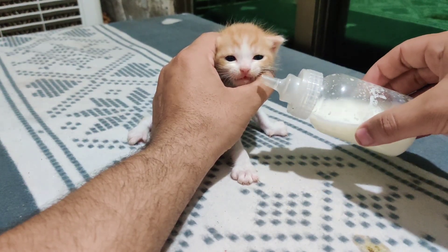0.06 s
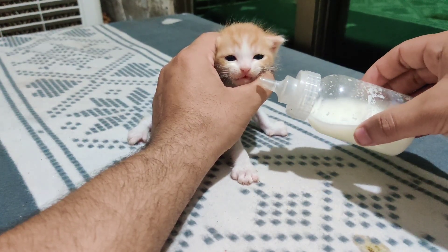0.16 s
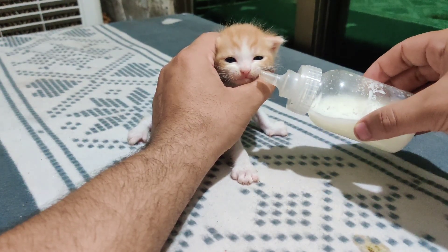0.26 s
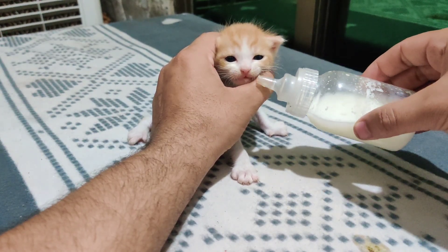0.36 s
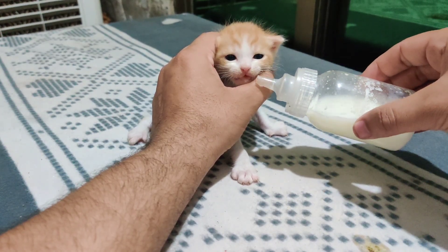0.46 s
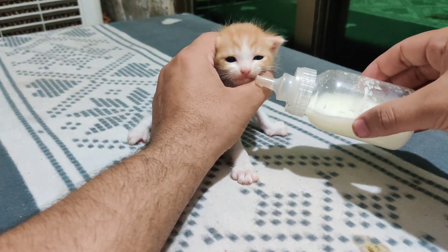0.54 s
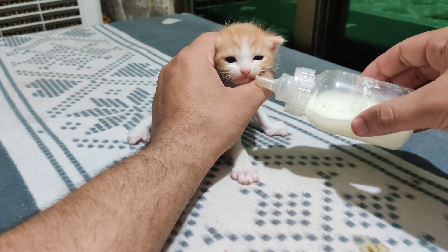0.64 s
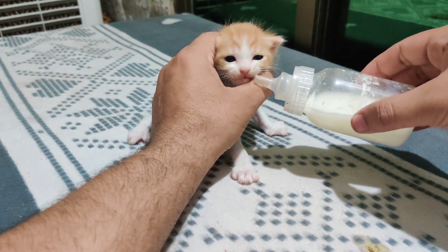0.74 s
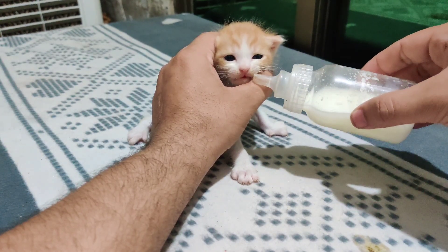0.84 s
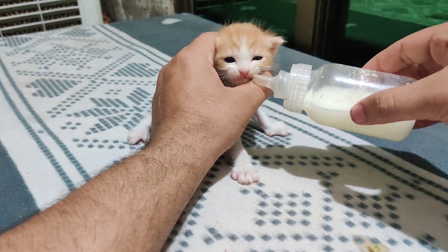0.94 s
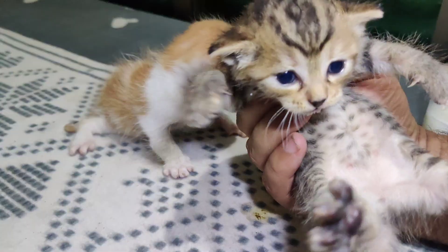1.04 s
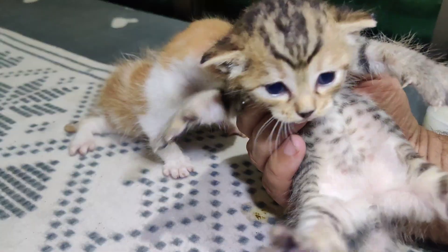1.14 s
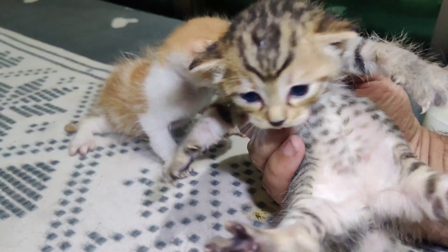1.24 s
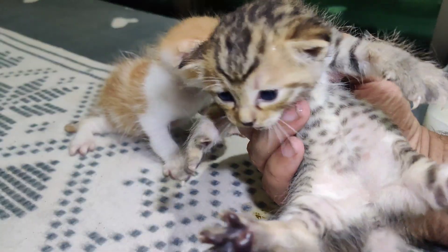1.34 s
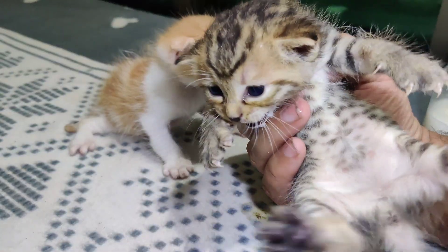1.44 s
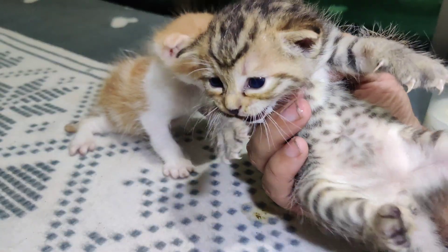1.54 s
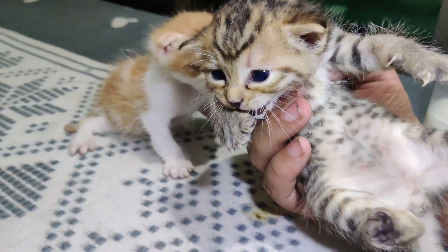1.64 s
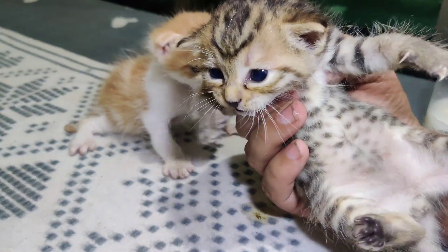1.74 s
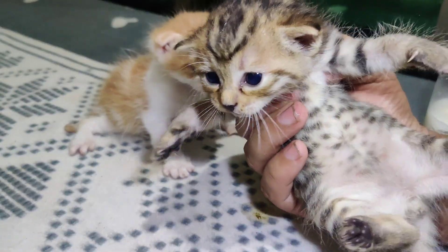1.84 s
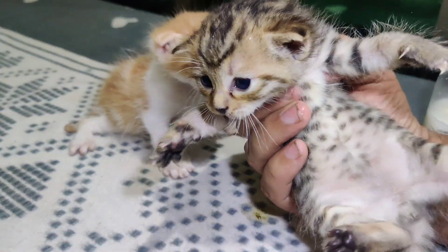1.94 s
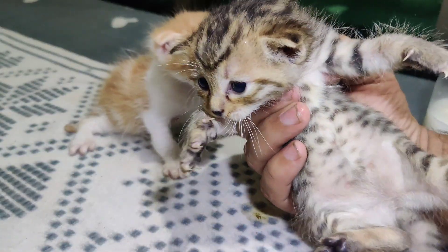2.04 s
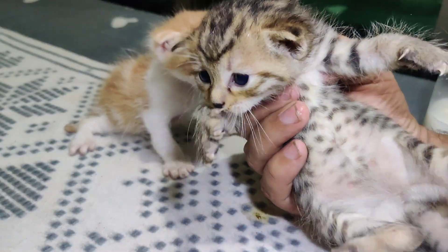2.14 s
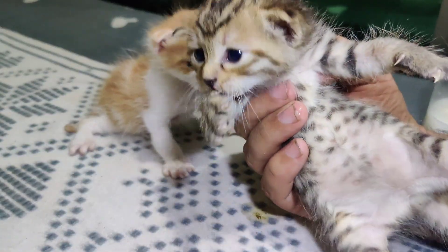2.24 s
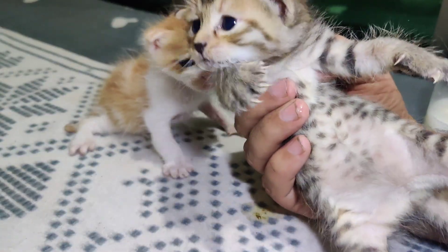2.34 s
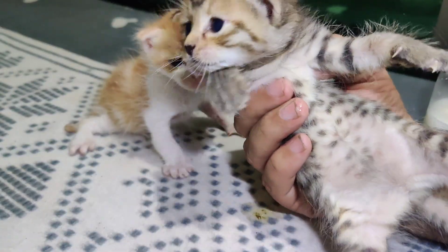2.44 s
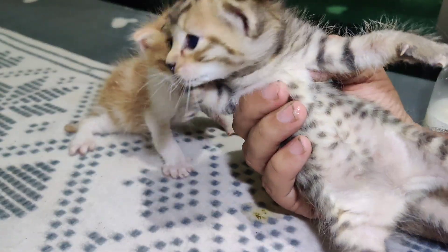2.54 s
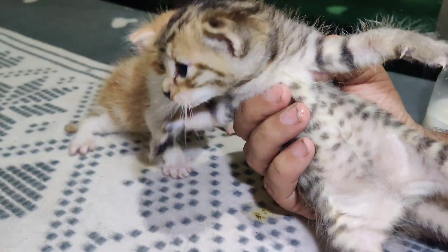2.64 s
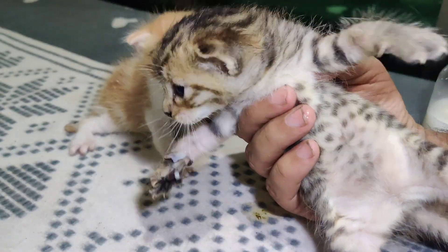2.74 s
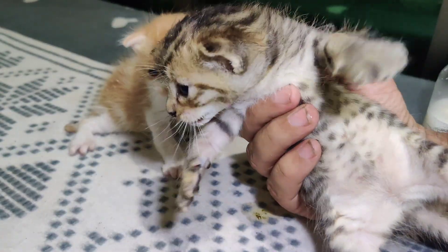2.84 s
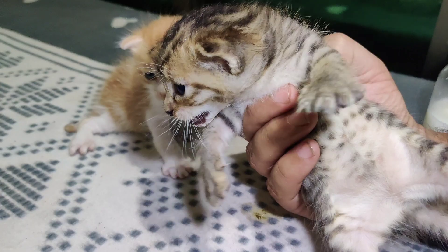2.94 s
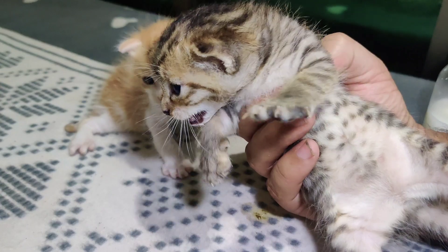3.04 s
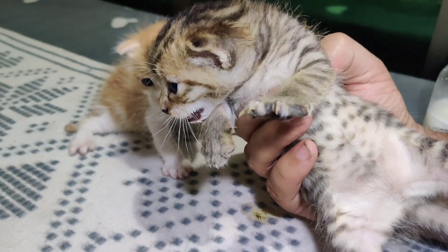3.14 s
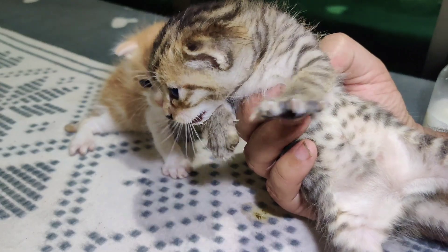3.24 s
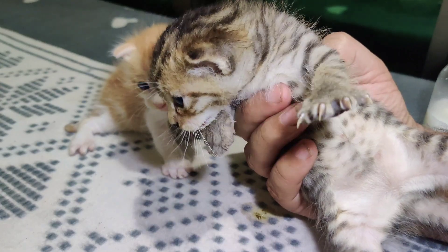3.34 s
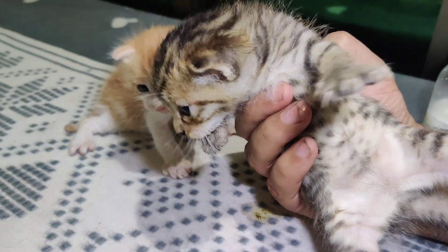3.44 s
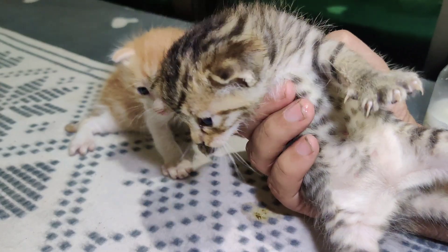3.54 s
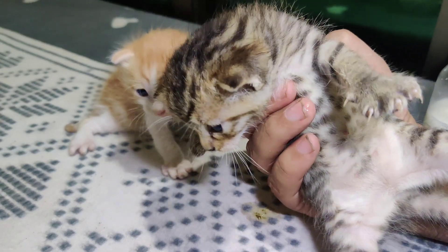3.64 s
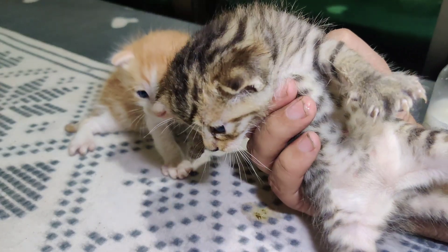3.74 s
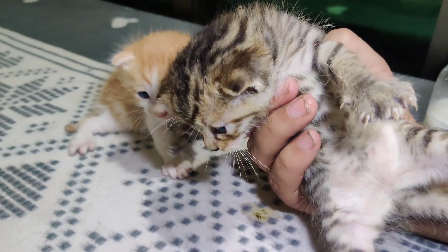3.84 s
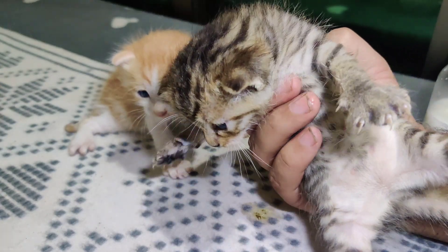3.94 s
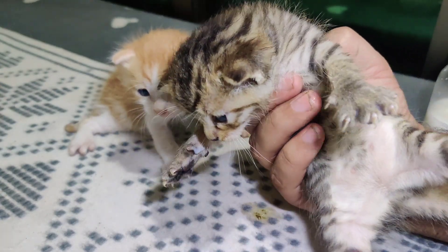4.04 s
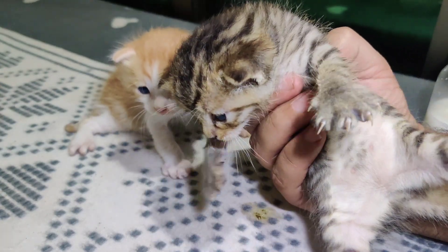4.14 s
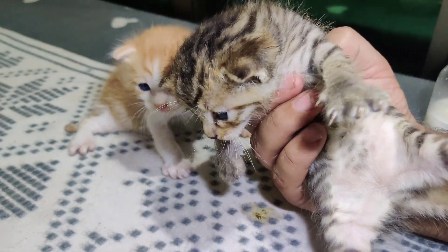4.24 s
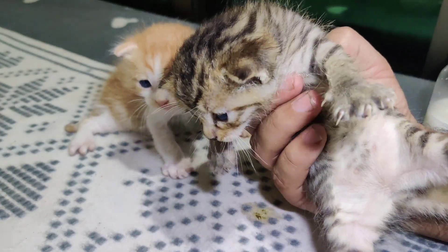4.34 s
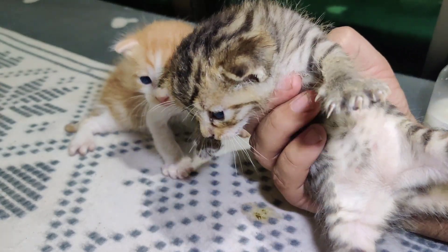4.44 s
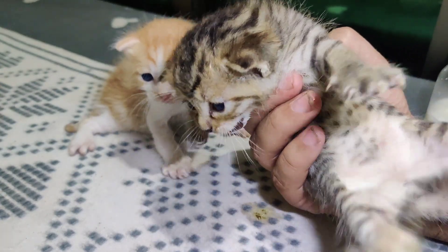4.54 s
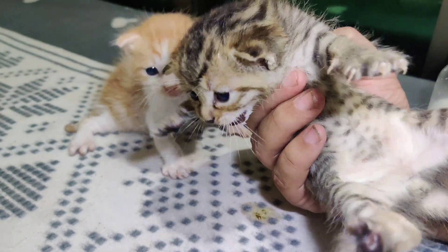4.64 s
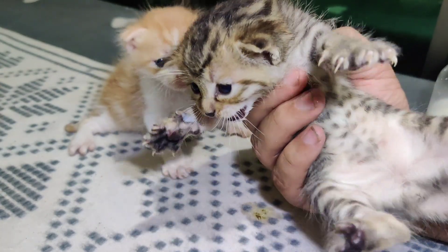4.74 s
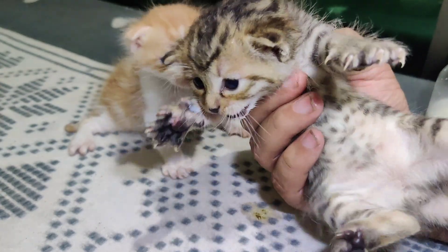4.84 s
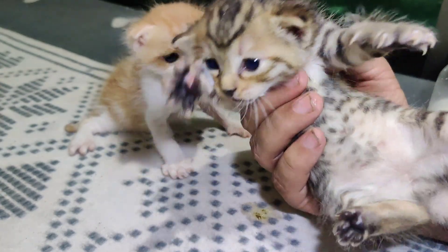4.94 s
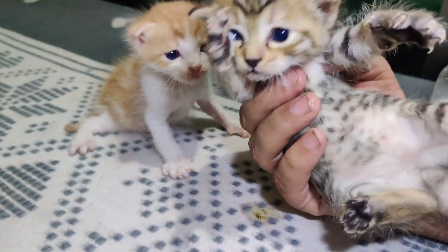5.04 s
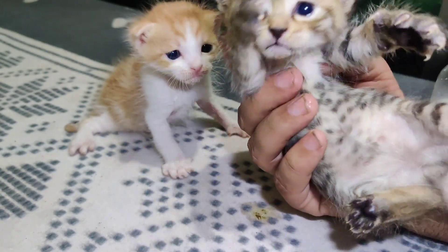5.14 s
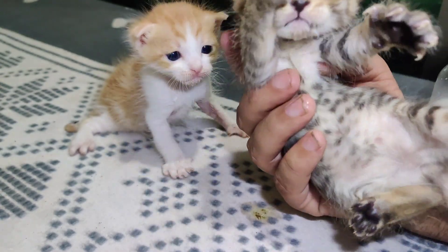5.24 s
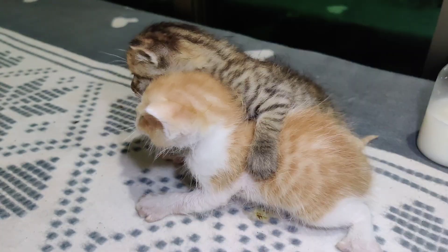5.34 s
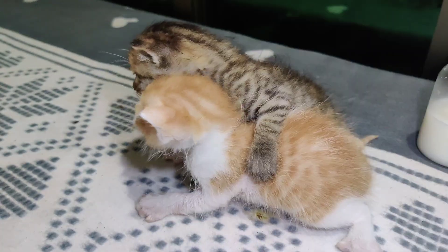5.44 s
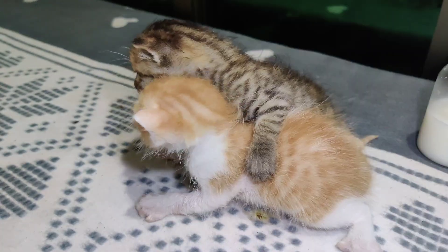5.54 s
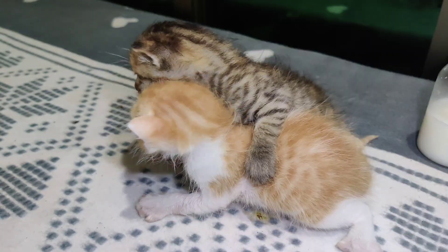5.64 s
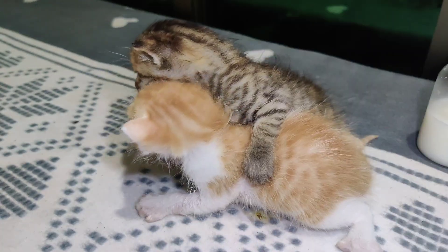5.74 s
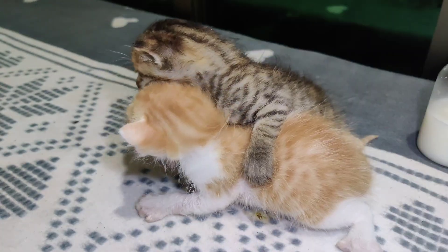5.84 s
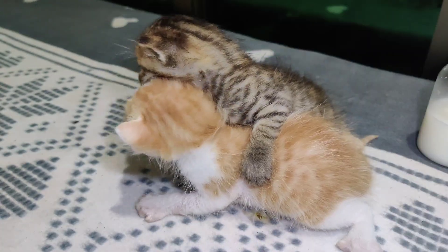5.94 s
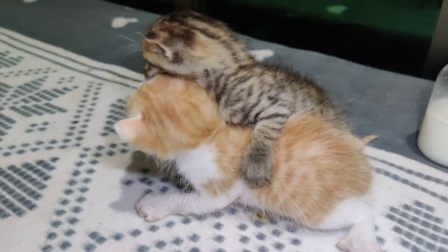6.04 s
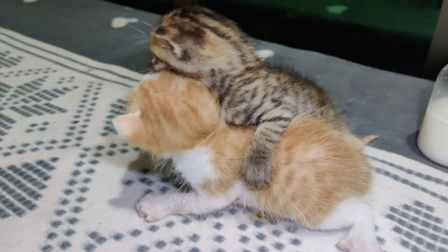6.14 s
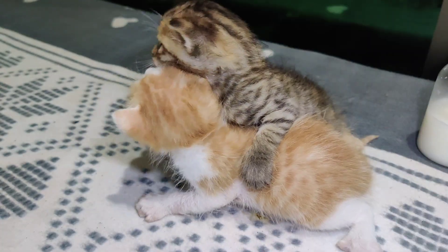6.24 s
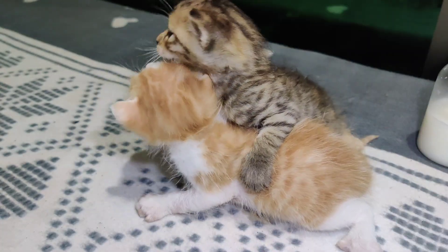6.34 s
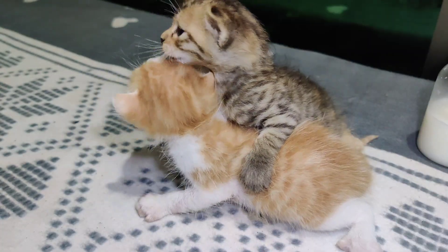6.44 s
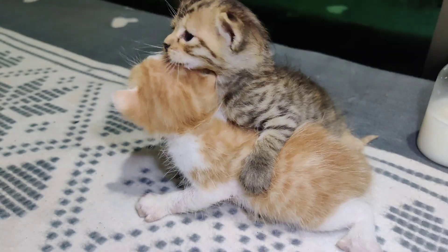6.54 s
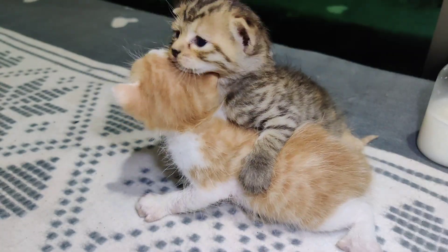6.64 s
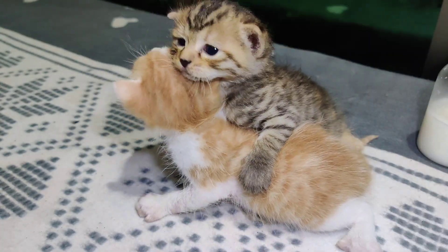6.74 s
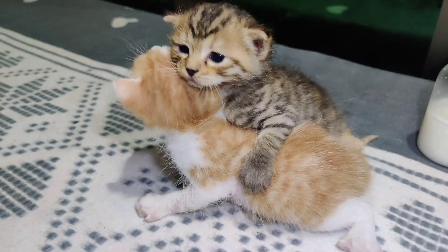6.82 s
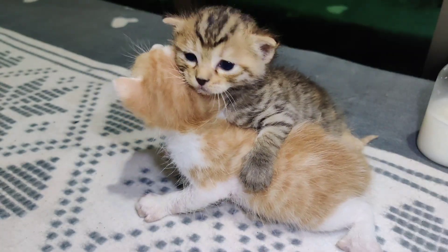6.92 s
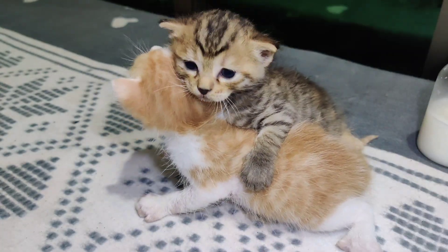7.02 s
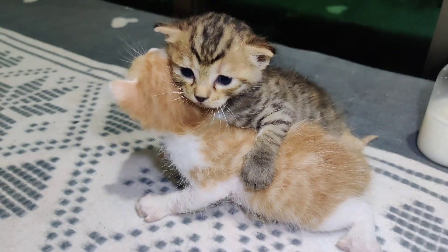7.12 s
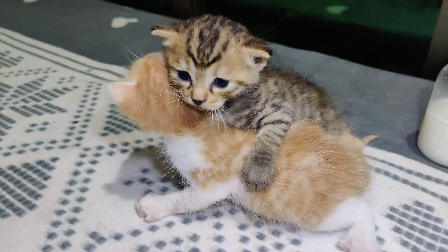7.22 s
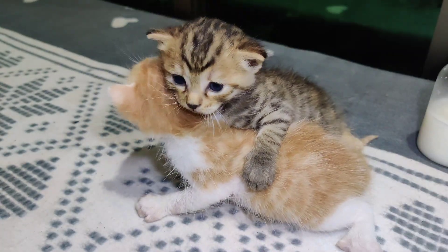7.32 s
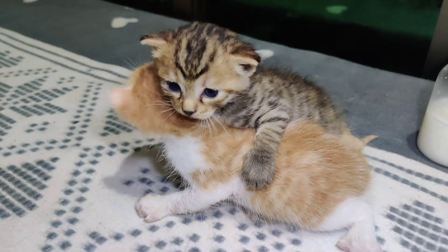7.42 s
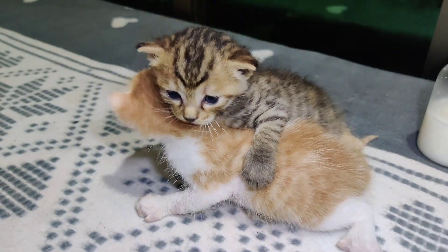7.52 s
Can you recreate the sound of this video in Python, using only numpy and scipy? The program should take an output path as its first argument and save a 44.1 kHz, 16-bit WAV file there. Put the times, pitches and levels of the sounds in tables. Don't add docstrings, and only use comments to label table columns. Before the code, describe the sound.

Close phone microphone indoors: low blurry fan air with a wavering motor drone and faint whistle. A baby kitten gives a short weak mew, a second with a hoarse crack at its start, a third long falling one ending with a thump, and a fourth, strained and quavering, among knocks and a brief rustle. An abrupt edit cuts it off; quiet hum continues to the end.

```python
import sys
import numpy as np
from scipy import signal
from scipy.fft import rfft, irfft, next_fast_len
from scipy.io import wavfile
from scipy.ndimage import uniform_filter1d, map_coordinates

SR = 44100
rng = np.random.default_rng(int(sys.argv[2]) if len(sys.argv) > 2 else 0)


def master(y):
    cut = np.clip(np.atleast_2d(y).T, -1, 1)
    pcm = np.round(cut * 32767)
    wavfile.write(sys.argv[1], SR, pcm.astype(np.int16))


def attenuation_scalar(level_db):
    decades = np.asarray(level_db, float) / 20
    return 10 ** decades


N = 334278


def unit(x):
    return x / np.sqrt(np.mean(x ** 2) + 1e-20)


def along(points, hz):
    f, v = np.transpose(points)
    return np.interp(np.log(hz + 1), np.log(f + 1), v)


def curves(rows):
    s, *cols = np.transpose(rows)
    return [np.interp(np.arange(N) / SR, s, c) for c in cols]


def window(start, end, fade):
    t = np.arange(N) / SR
    return np.clip(np.minimum(t - start, end - t) / fade, 0, 1)


def wobble(rate):
    knots = rng.standard_normal(int(N * rate / SR) + 4)
    return map_coordinates(knots, [np.arange(N) * rate / SR])


def filtered(x, response):
    m = next_fast_len(N + SR // 2)
    return irfft(rfft(x, m) * response(np.fft.rfftfreq(m, 1 / SR)), m)[:N]


# f/Hz, width/Hz, level/dB
THROAT = [(1700, 140, -4), (3520, 640, -1.5), (4420, 610, 2.5), (6670, 520, -4)]


def throat(f):
    response = 0
    for k, (centre, width, db) in enumerate(THROAT):
        response = response + (-1) ** k * attenuation_scalar(db) * 1j * f * width / (centre ** 2 - f * f + 1j * f * width)
    return response


def mew(rows, fourth_db, breath_db, crest, quaver_hz, quaver):
    rows = np.array(rows)
    start = rows[0] * [1, 0.66, 1, np.sqrt(0.66), 1] + [-0.028, 0, -22.5, 0, -22.5 / 2]
    end = rows[-1] * [1, 0.84, 1, 1, 1] + [0.028, 0, -25, 0, -25 / 2]
    gesture = curves(np.vstack([start, rows, end]))
    pitch, db1, mouth, ring_db = [uniform_filter1d(c, size=600) for c in gesture]

    strain = np.clip((pitch - 1330) / (1400 - 1330), 0, 1)
    pitch = pitch * (1 + quaver * strain * np.cos(2 * np.pi * quaver_hz * (np.arange(N) / SR - crest)))
    jitter = 0.0032 * wobble(45) + 0.0055 * wobble(400)
    phase = 2 * np.pi * np.cumsum(pitch * (1 + jitter)) / SR

    octaves = np.log2(np.outer([2, 3], pitch) / mouth)
    db2, db3 = ring_db - np.where(octaves < 0, 101, 67.5) * octaves ** 2
    fed_db = db1 - 14 - 90 * np.maximum(3200 - mouth, 0) / 1000
    db5 = fed_db - 25 * ((5 * pitch - 6500) / 560) ** 2
    neighbours_db = np.maximum.reduce([db2 - 0.5, db5 - 14.5, db3 - 27.5])
    db4 = fourth_db + np.minimum(db3 - 12.5, neighbours_db)

    tone = 0
    for k, db in enumerate([db1, db2, db3, db4, db5, db4 - 13]):
        level = attenuation_scalar(db + 0.15 * wobble(60))
        scatter = 1 + 0.022 * (k + 1) * wobble(700)
        tone = tone + level * scatter * np.sin((k + 1) * phase + k)

    noise = rng.standard_normal(N)
    breath = unit(filtered(noise, lambda f: throat(f) ** 2 / (1 + (f / 4500) ** 6)))
    opening = 1 + 0.7 * np.sin(phase)
    leak = attenuation_scalar(breath_db) * (attenuation_scalar(db3) + attenuation_scalar(db2 - 6.0)) * opening * breath
    return window(start[0], end[0], 0.0062) * (np.sqrt(2) * tone + leak)


# t/s, level/dB
RASP = [
    (1.54, -70.5),
    (1.566, -46.5),
    (1.575, -42.5),
    (1.607, -42.5),
    (1.626, -43),
    (1.645, -56),
]


def rasp():
    rows = np.array(RASP)
    start, end = rows[0, 0], rows[-1, 0]
    pitch = np.interp(np.arange(N) / SR, [start, end], [820, 920])
    cycle = np.cumsum(pitch * (1 + 0.06 * wobble(300))) / SR
    pulses = np.diff(np.floor(cycle), prepend=0) * attenuation_scalar(2.5 * wobble(900))
    gate = 0.5 * (1 + np.cos(2 * np.pi * cycle))
    source = unit(pulses) + gate * rng.standard_normal(N)
    voiced = unit(filtered(source, lambda f: throat(f) ** 2))
    return window(start, end, 0.0076) * attenuation_scalar(curves(rows)[0]) * voiced


# t/s, pitch f/Hz, fundamental level/dB, mouth resonance f/Hz, mouth ring level/dB
MEW_A = [(.9, 1151, -58, 3600, -45), (.97, 1100, -50, 3400, -48), (1.012, 982, -68, 3000, -66),
         (1.052, 967, -51, 3100, -53), (1.09, 955, -43.5, 2300, -60), (1.125, 932, -50, 2330, -61),
         (1.155, 879, -59, 2250, -64), (1.19, 777, -63, 2100, -74), (1.23, 612, -55, 1500, -79)]
LEAD_B = [
    (1.495, 618, -53, 1400, -61),
    (1.52, 860, -51, 1900, -61.5),
    (1.54, 850, -50.5, 1700, -59.5),
]
MEW_B = [(1.607, 1250, -53.5, 3900, -58), (1.625, 1352, -45.5, 4200, -35), (1.66, 1408, -36.5, 4150, -38),
         (1.74, 1438, -32.5, 3190, -40), (1.865, 1429, -33, 2820, -40.5), (1.945, 1336, -30.5, 1990, -54),
         (2.035, 1162, -39, 2600, -70), (2.066, 990, -61, 2300, -64), (2.12, 800, -64, 1700, -59)]
MEW_C = [(3.03, 778, -53.5, 2200, -74), (3.105, 1070, -62, 3230, -60.5), (3.127, 1150, -56.5, 3630, -35),
         (3.168, 1270, -56, 3900, -44), (3.197, 1317, -39, 3880, -52), (3.221, 1400, -49, 3650, -56),
         (3.254, 1431, -36, 3240, -48), (3.4, 1429, -30.5, 1980, -48), (3.552, 1286, -32, 1700, -60)]
MEW_D = [(4.608, 784.6, -42.5, 1500, -52.5), (4.646, 963, -36, 2600, -61), (4.7, 1185, -44, 3830, -34.5),
         (4.737, 1251, -37, 3950, -32), (4.775, 1339, -36.5, 3170, -54.5), (4.806, 1394, -33, 2910, -35),
         (4.972, 1426, -31, 3010, -35), (5.219, 1304, -31, 2040, -55), (5.278, 1180, -36, 1700, -62)]
# 4th overtone level/dB, breath level/dB, quaver crest t/s, quaver f/Hz, quaver share
VOICES = [
    (-17, -37, 1.1, 8, .001),
    (-6, -25, 1.5, 8, .001),
    (4, -27, 1.835, 10.5, 0.0062),
    (-6.5, -28, 3.7, 9.2, 0.011),
    (2.5, -22.5, 4.965, 7.2, .017),
]


def kitten():
    calls = (MEW_A, LEAD_B, MEW_B, MEW_C, MEW_D)
    mews = sum(mew(call, *voice) for call, voice in zip(calls, VOICES))
    return room(mews + rasp(), wet_db=-16)


# f/Hz, t60/s
ROOM = [(200, 0.31), (1400, 0.44), (3500, 0.38), (6000, 0.38)]


def room(x, wet_db):
    hz, t, z = signal.stft(rng.standard_normal(SR // 2), SR, nperseg=256)
    decay = attenuation_scalar(-60 * t / along(ROOM, hz)[:, None])
    tail = np.pad(unit(signal.istft(z * decay, SR, nperseg=256)[1]), (500, 0))
    slap = np.exp(-((np.arange(len(tail)) / SR - 0.05) / 0.004) ** 2)
    tail = tail + attenuation_scalar(23.5) * slap * rng.standard_normal(len(tail))
    return x + attenuation_scalar(wet_db) * signal.fftconvolve(x, tail / np.linalg.norm(tail))[:N]


# t/s, peak level/dB, f/Hz, t60/s
BUMPS = [(3.553, -29, 250.7, 0.095), (4.645, -29, 169, 0.063), (4.659, -25.5, 276, 0.056),
         (4.665, -35.5, 233, 0.062), (4.68, -31, 209, 0.08), (4.704, -46.5, 194, 0.08),
         (4.549, -44, 119.5, 0.2), (4.949, -42.5, 115.3, 0.25)]
# t/s, peak level/dB, f/Hz, t60/s
TICKS = [(3.5543, -42.5, 2183, 0.008), (3.9048, -56.5, 2240, 0.01), (4.455, -60, 2030, 0.008),
         (4.6437, -33, 3200, 0.0051), (4.6804, -47, 3500, 0.011), (6.6024, -61, 2230, 0.008),
         (1.5234, -62, 6340, 0.0066), (3.043, -61, 5500, 0.012), (3.0504, -74.5, 5880, 0.011),
         (3.5604, -54, 6380, 0.012), (3.9315, -58.5, 6140, 0.028), (4.2717, -57.5, 6100, 0.013)]
# t/s, level/dB
RUSTLE = [
    (4.647, -66),
    (4.651, -58.5),
    (4.667, -55),
    (4.69, -68),
]


def handling():
    out, t = np.zeros(N + SR), np.arange(SR // 4) / SR
    for s, db, hz, t60 in BUMPS:
        shell = np.sin(2 * np.pi * hz * t) + 0.21 * np.sin(2 * np.pi * 2.3 * hz * t)
        back_plate = 0.1 * np.sin(2 * np.pi * 1690 * t)
        soft_onset = 1 - np.exp(-t / 0.0031)
        out[round(s * SR):][:len(t)] += attenuation_scalar(db - 60 * t / max(t60, 0.01)) * soft_onset * (shell + back_plate)
    for s, db, hz, t60 in TICKS:
        drift = np.cumsum(rng.normal(0, 0.33, len(t)))
        burst = np.cos(2 * np.pi * hz * t + drift) + 0.5 * rng.standard_normal(len(t))
        out[round(s * SR):][:len(t)] += attenuation_scalar(db - 60 * t / max(t60, 0.002)) * burst
    skin = attenuation_scalar(5 * wobble(500)) * rng.standard_normal(N)
    grains = unit(filtered(skin, lambda f: 1 + 2.9 / (1 + 1j * f / 900)))
    slide = window(RUSTLE[0][0], RUSTLE[-1][0], 0.0028) * attenuation_scalar(curves(RUSTLE)[0] + 13.5) * grains
    return room(out[:N] + slide, wet_db=-8.5)


def patchy(response, patchy_db):
    z = signal.stft(rng.standard_normal(N), nperseg=2048)[2]
    field = uniform_filter1d(rng.standard_normal(z.shape), size=3, axis=0)
    field = uniform_filter1d(field, size=8, axis=1)
    noise = signal.istft(z * attenuation_scalar(patchy_db * unit(field)), nperseg=2048)[1][:N]
    return unit(filtered(noise, response))


# motor drone level/dB, whistle level/dB
HUM_DB = [
    (-56, -52.5),
    (-59, -55),
    (-60, -58.5),
]
# t/s, drone level/dB, whistle level/dB
SURGES = [(.35, -60, -63), (.55, -55, -53), (1.26, -54, -60), (1.55, -60, -57.5), (2.62, -76, -57),
          (3.62, -70, -50), (3.92, -50.5, -54), (4.31, -75, -45), (4.39, -52, -58), (4.58, -47, -71),
          (4.69, -71, -47), (5.079, -52.5, -76), (6.38, -53.5, -58), (6.93, -68, -52), (7.57, -51, -76)]


def hum(which):
    t = np.arange(N) / SR
    spot = np.searchsorted([cut[0] for cut in CUTS], t)
    gain = attenuation_scalar(np.array(HUM_DB)[spot, which] + 3.5 * wobble(9))
    for row in SURGES:
        gain = gain + attenuation_scalar(row[1 + which]) * np.exp(-((t - row[0]) / 0.038) ** 2)
    return gain


# t/s, level/dB
FAN = [(0.0, -51), (1.01, -49.5), (1.2, -51), (1.88, -52), (3.29, -51.5), (3.69, -51.5), (4.71, -50.5),
       (4.79, -49), (6.25, -51.5), (6.93, -52), (7.05, -51), (7.58, -51.5)]
# f/Hz, level per Hz/dB
AIR = [(24, -69), (40, -39.5), (91, -17.5), (102, -14), (151, 0.5), (254, -11), (392, -7), (466, -10.5),
       (579, -8.5), (1160, -14), (3440, -32), (6460, -44), (7200, -45.5), (9360, -78), (15800, -120)]
# f/Hz, level per Hz/dB
AIR_FIRST = [(24, -71), (40, -42), (80, -24), (100, -9), (141, -4.5), (351, -12), (437, -8.5), (752, -11.5),
             (1040, -19), (1570, -20), (2650, -34), (6460, -45.5), (7200, -49.5), (9360, -84),
             (15800, -120)]


def fan():
    def low(f):
        return 1 / (1 + (f / 1000) ** 4)

    def air_colour(f):
        notch = 1 - 0.59 * np.exp(-((f - 152) / 25) ** 2) - 0.31 * np.exp(-((f - 420) / 40) ** 2)
        return attenuation_scalar(along(AIR, f)) * notch * np.sqrt(low(f))

    def hiss_colour(f):
        return attenuation_scalar(along(AIR, f)) * np.sqrt(1 - low(f))

    def guard(f):
        return 1 / (1 + ((f - 400) / 14) ** 2) + 1 / (1 + ((f - 442) / 12) ** 2)

    air_db, = curves(FAN)
    air = attenuation_scalar(air_db - 1 + 0.46 * wobble(30)) * patchy(air_colour, patchy_db=1.58)
    hiss = attenuation_scalar(-66.5 + 7 + 0.81 * wobble(25)) * patchy(hiss_colour, patchy_db=1.5)
    wind = air + hiss
    first = attenuation_scalar(2.5) * filtered(wind, lambda f: attenuation_scalar(along(AIR_FIRST, f) - along(AIR, f)))
    whistle = attenuation_scalar(-6.5) * hum(which=1) * patchy(guard, patchy_db=0.0)
    turn = 2 * np.pi * np.cumsum(151 * (1 + 0.034 * wobble(14))) / SR
    drone = hum(which=0) * np.sin(turn)
    return np.where(np.arange(N) < CUTS[0][1] * SR, first, wind) + whistle + drone


def phone(x):
    def band(f):
        return (0.045 + 1 / np.sqrt(1 + (105 / (f + 1)) ** 12)) / (1 + (f / 7250) ** 60)
    return filtered(x, band)


# start t/s, full level again t/s, level between/dB
CUTS = [
    (1.0049, 1.0116, -12),
    (5.2906, 5.3033, -8),
]
# t/s, size level/dB
JUMPS = [
    (1.0055, -54),
    (1.0065, -64),
    (1.0114, -47),
    (5.291, -35.5),
    (5.302, -43),
]


def scene():
    t = np.arange(N) / SR
    (first, _, _), (last, _, _) = CUTS
    voice = phone(kitten()) * window(first, last, 0.0004)
    dip_db = sum(db * ((t >= a) & (t < b)) for a, b, db in CUTS)
    dip = uniform_filter1d(attenuation_scalar(dip_db), size=30)
    clicks = sum(attenuation_scalar(db) * (t >= s) * np.exp(-np.abs(t - s) / 0.00043) for s, db in JUMPS)
    return (voice + dip * phone(fan() + handling()) + clicks)[None]


def band_limit(x):
    return signal.sosfilt(signal.butter(12, 15800, fs=SR, output="sos"), x)


def record(dry):
    mix = dry + attenuation_scalar(-95.5) * rng.standard_normal(dry.shape)
    return band_limit(mix)


dry = scene()
out = record(dry)
master(out)
```